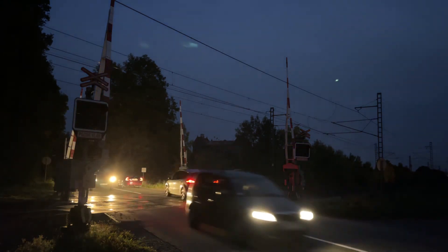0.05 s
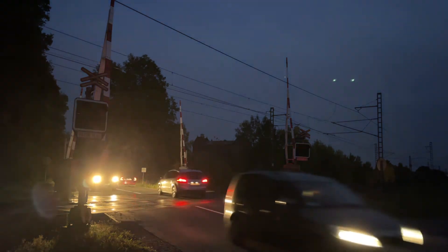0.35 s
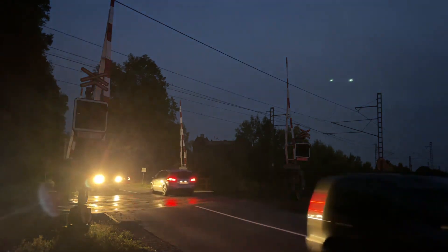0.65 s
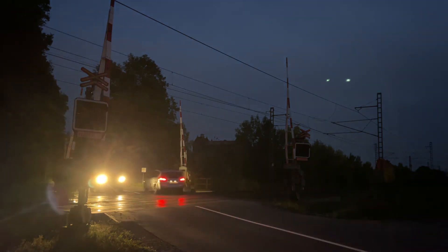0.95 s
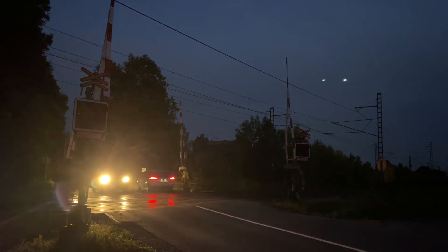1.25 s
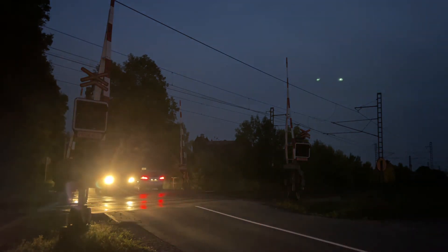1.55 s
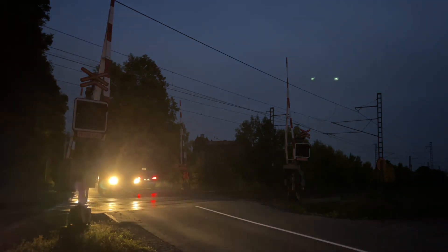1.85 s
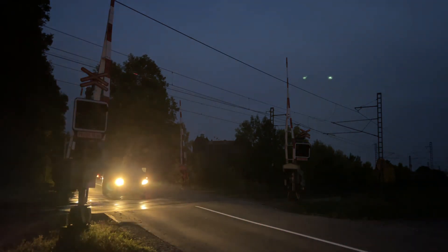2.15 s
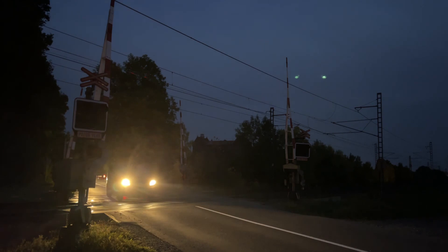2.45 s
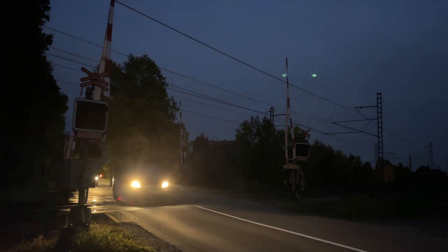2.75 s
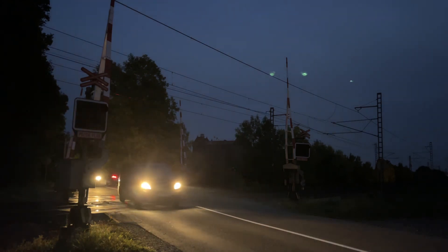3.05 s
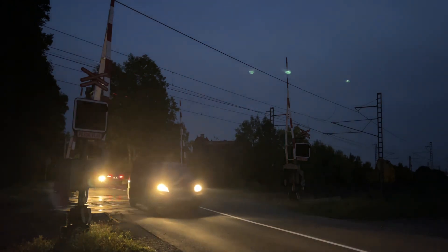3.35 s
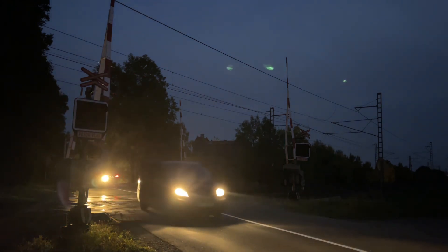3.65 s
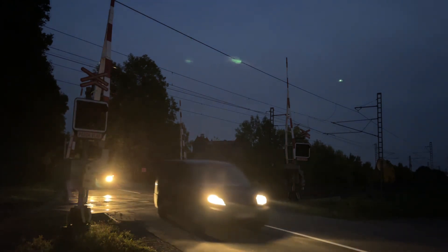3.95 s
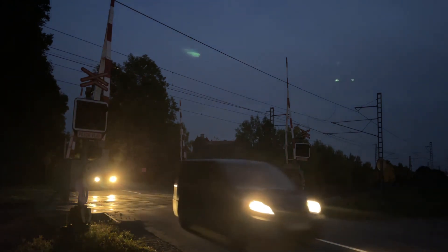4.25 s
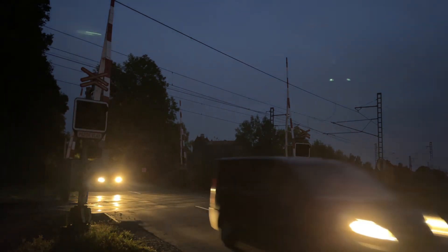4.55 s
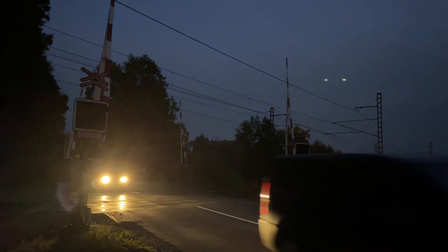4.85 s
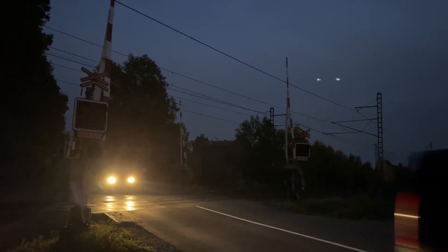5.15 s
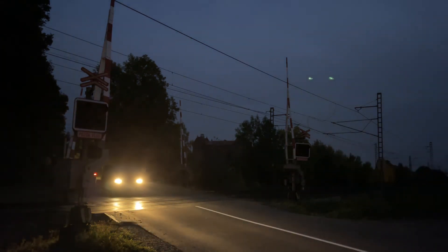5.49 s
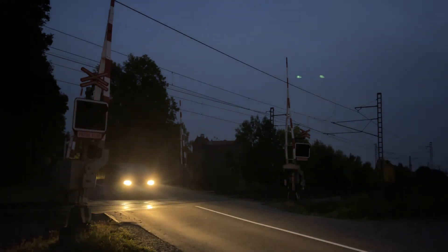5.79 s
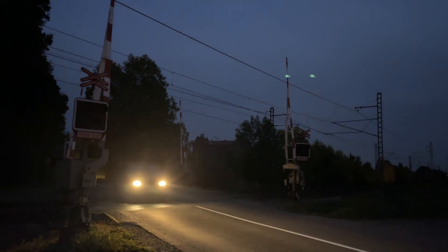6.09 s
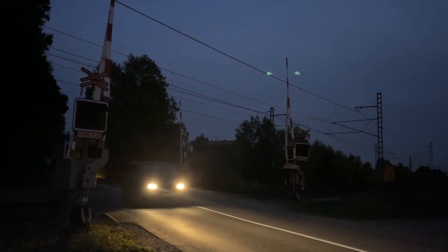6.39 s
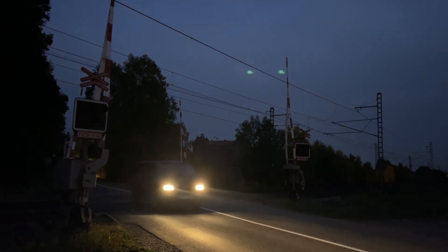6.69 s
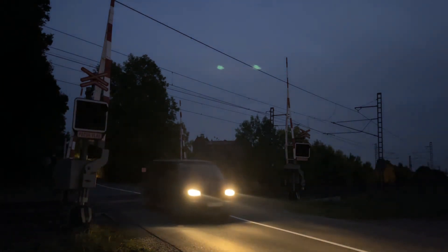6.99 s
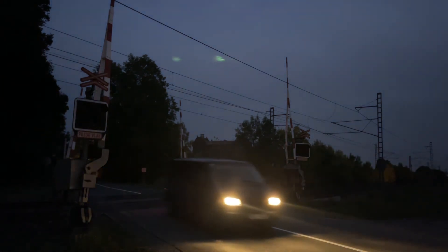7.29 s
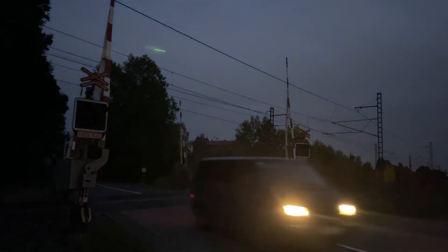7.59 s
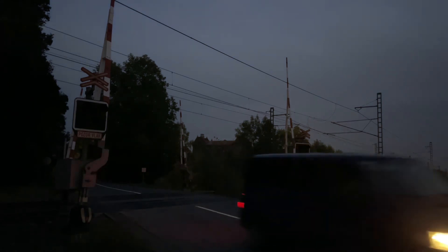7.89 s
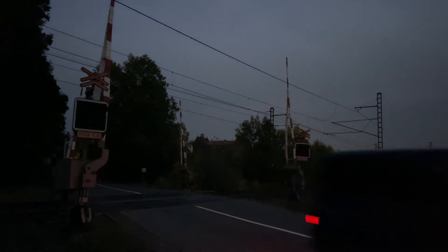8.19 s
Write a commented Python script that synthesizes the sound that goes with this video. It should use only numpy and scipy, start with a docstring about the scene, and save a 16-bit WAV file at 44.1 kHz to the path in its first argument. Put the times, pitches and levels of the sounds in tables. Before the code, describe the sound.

Three vehicles pass one after another on a damp road, engines and tyre roar swelling and fading, wheels thumping over a railway crossing.

```python
"""First a car's tyres roar on damp asphalt and thud over a railway crossing at dusk. Two diesel vans
follow it past on the right. A low hum sinks as the car goes by; the first van changes gear.
The treads hiss, throw spray and flick grit, the slabs drum, exhausts boom and engine bays growl.
The first van whines as it revs and its turbo lets off air; a loose slab clacks under the last.
Two microphones a hand apart stand at the roadside."""
import sys
import numpy as np
from scipy import signal
from scipy.fft import rfft, irfft, next_fast_len
from scipy.io import wavfile
from scipy.ndimage import map_coordinates

SR = 44100
rng = np.random.default_rng(int(sys.argv[2]) if len(sys.argv) > 2 else 0)


def inscribe(sig):
    """Save sig as 16-bit PCM at rate SR to the path in sys.argv[1].

    A 1-D sig is mono; a 2-D sig holds one channel per row.
    Samples are clipped to [-1, 1] before scaling.
    """
    pcm = np.round(np.clip(np.atleast_2d(sig).T, -1, 1) * 32767)
    wavfile.write(sys.argv[1], SR, pcm.astype(np.int16))


N = 367353
TIME = np.arange(N) / SR
FFT_SIZE = next_fast_len(N, real=True)
BIN_HZ = np.maximum(np.arange(FFT_SIZE // 2 + 1) * SR / FFT_SIZE, 1)


def from_db(db):
    """Decibels to gain."""
    return 10 ** (np.asarray(db) / 20)


def rms_one(x):
    """Scale to unit power."""
    return x / np.sqrt(np.mean(x ** 2) + 1e-20)


def automation(points):
    """A curve through (time, value) breakpoints, one value a sample."""
    return np.interp(TIME, *np.transpose(points))


def at_hz(points, hz):
    """Read a curve along a log-frequency axis."""
    point_hz, values = np.transpose(points)
    return np.interp(np.log(hz), np.log(point_hz), values)


def held(start_s, end_s, attack_s, release_s):
    """Envelope that is 1 from start to end, with a straight ramp before and after."""
    return np.clip(1 + np.minimum((TIME - start_s) / attack_s, (end_s - TIME) / release_s), 0, 1)


def drift(rate):
    """Random modulation of rms 1 that takes a new turn rate times a second."""
    knots = rng.standard_normal(3000)
    return rms_one(np.interp(TIME * rate, np.arange(len(knots)), knots))


def band(x, low_hz, high_hz):
    """Causal band-pass."""
    sos = signal.butter(2, [low_hz, high_hz], "band", fs=SR, output="sos")
    return signal.sosfilt(sos, x + 1e-18)


def strikes(events):
    """One click for each row of t/s, level/dB."""
    clicks = np.zeros(N)
    for s, db in events:
        clicks[round(s * SR)] += from_db(db)
    return clicks


def ring(clicks, hz, t60):
    """A unit click sets a sine of height 1 ringing."""
    r, w = from_db(-60 / (t60 * SR)), 2 * np.pi * hz / SR
    return signal.lfilter([0, np.sin(w)], [1, -2 * r * np.cos(w), r * r], clicks + 1e-18)


def colour(eq, low_hz, high_hz, order=12):
    """Gain per frequency: an EQ curve between two steep edges."""
    edges = np.sqrt((1 + (low_hz / BIN_HZ) ** order) * (1 + (BIN_HZ / high_hz) ** order))
    return from_db(at_hz(eq, BIN_HZ)) / edges


def noise(gain):
    """White noise shaped by a gain per frequency."""
    return irfft(gain * rfft(rng.standard_normal(FFT_SIZE)), FFT_SIZE)[:N]


def wide_noise(gain, likeness):
    """Mid-side noise of rms 1; its width follows the left-right likeness, clipped to -1..1."""
    alike = np.clip(at_hz(likeness, BIN_HZ), -1, 1)
    mid, side = noise(gain * np.sqrt(1 + alike)), noise(gain * np.sqrt(1 - alike))
    return rms_one(mid + side * [[1], [-1]])


def swell(peak_s, spread_s, hz, width_hz, db):
    """A band of noise under a bell-shaped fade."""
    bell = np.exp(-((TIME - peak_s) / spread_s) ** 2 / 2)
    rush = rms_one(band(rng.standard_normal(N), hz - width_hz / 2, hz + width_hz / 2))
    return from_db(db) * bell * rush


# Pass-bys of the car, the first van and the last van: closest at t/s, speed/(m/s)
PASSES = [(.85, 7.88), (5.05, 7.78), (8.35, 7)]
LANE_DISTANCE_M, ROAD_ANGLE_DEG, WHEELBASE_M = 4.52, -35, 1.4
MIC_SPACING_M, SOUND_M_S = 0.14, 343


def path(closest_s, speed, ahead_m=0):
    """Distance/m and pan (-1 left, 1 right) of a point on a vehicle; sound bends round the housing."""
    along_m = speed * (closest_s - TIME) - ahead_m
    sine = np.sin(np.arctan2(LANE_DISTANCE_M, along_m) + np.radians(ROAD_ANGLE_DEG))
    return np.hypot(along_m, LANE_DISTANCE_M), (sine + np.arcsin(sine)) / (1 + np.pi / 2)


def axle_pans(vehicle):
    """Pans of the front and the rear wheels."""
    return [path(*vehicle, ahead_m=end * WHEELBASE_M / 2)[1] for end in (1, -1)]


def place(x, pan, shade_db=0.66):
    """A source on the right reaches the left microphone later and weaker."""
    lag = pan * MIC_SPACING_M / SOUND_M_S * SR / 2
    return np.array([map_coordinates(x, [np.arange(N) + side * lag], order=3, mode="nearest")
                     * from_db(side * shade_db * pan) for side in (-1, 1)])


# Faders by layer; each is thrown forward or back, so it peaks early or late: level/dB, lead/s
CAR_LAYERS = {"rumble": (-33, -.05), "drone": (-31, 0.22), "roar": (-28, 0.3), "hiss": (-40, 0.52),
              "fizz": (-46, 0.53), "spray": (-41, 0.46), "boom": (-33.5, 0.21), "second order": (-43, 0.47),
              "third order": (-42.5, 0.22), "growl": (-32.5, 0.16)}
VAN_LAYERS = {"rumble": (-32, -0.064), "drone": (-31, 0.23), "roar": (-31.5, 0.35), "hiss": (-39, 0.084),
              "fizz": (-41.5, 0.15), "spray": (-34.5, 0.19), "boom": (-21, 0.45),
              "second order": (-36.5, -0.044), "third order": (-32.5, 0.017), "growl": (-33, 0.23)}
LAST_VAN_LAYERS = {"rumble": (-32, 0.085), "drone": (-31.5, 0.44), "roar": (-29, 0.18),
                   "hiss": (-40.5, 0.16), "fizz": (-47, 0.11), "spray": (-44, 0.23), "boom": (-22.5, .01),
                   "second order": (-30, -0.065), "third order": (-34, .06), "growl": (-39, 0.32)}
# Each layer's loss per doubling of distance: approaching/dB, leaving/dB
FALL_OFF = {"rumble": (4.53, 5.66), "drone": (7.1, 8.5), "roar": (5.2, 9), "hiss": (4.3, 10.5),
            "fizz": (6.8, 10.6), "spray": (12.4, 27.3), "boom": (11.5, 12.3), "second order": (8.6, 6.4),
            "third order": (5.95, 13.8), "growl": (5, 10.4)}


def passing(vehicle, layers):
    """Fader ride in dB for each layer of a vehicle: up to its peak, then away with distance."""
    closest_s, speed = vehicle
    levels = {}
    for name, (peak_db, lead_s) in layers.items():
        peak_s = closest_s - lead_s
        doublings = np.log2(path(peak_s, speed)[0] / LANE_DISTANCE_M)
        levels[name] = peak_db - doublings * np.where(TIME < peak_s, *FALL_OFF[name])
    return levels


# Sizzle of spray off the damp road: f/Hz, level/dB
SPRAY_EQ = [(6000, 4), (7500, -3), (8600, -2), (9700, 2.5), (11200, 6.5), (12000, -1), (13000, -23)]
# Stereo image of spray and grit: f/Hz, left-right likeness
SPRAY_LIKENESS = [(6400, 0.29), (7100, -0.46), (7800, 1), (8700, 0.064), (9300, 0.55), (9800, -1.45),
                  (10500, -1.07), (11100, -0.21), (11700, 0.87)]


def spray(level_db, sizzle_db=1.2, even_db=-47.5, brightening=0.33):
    """Droplets off the treads sizzle in the top octave; nearer, denser spray is brighter."""
    mist = wide_noise(colour(SPRAY_EQ, 6150, 16000), SPRAY_LIKENESS)
    coarse = irfft(rfft(mist, FFT_SIZE) / (1 + (BIN_HZ / 9200) ** 24), FFT_SIZE)[:, :N]
    fine = mist - coarse
    tilt_db = brightening * (level_db - even_db)
    tilted = from_db(-tilt_db) * coarse + from_db(np.minimum(tilt_db, 0)) * fine
    return from_db(level_db + sizzle_db * drift(150)) * tilted


# Ticks of grit flicked from the tread: t/s, level/dB before the trim
GRIT_TICKS = [(6.326, -40), (6.428, -42), (6.508, -34), (6.527, -46), (6.588, -40), (6.823, -44)]
# Their bright tone: f/Hz, level/dB
GRIT_EQ = [(5500, -3), (8000, 5), (9500, -6), (11500, 6), (13000, -14)]


def grit(t60=0.073, trim_db=-7.5):
    """Small stones rattle in the wheel arches with short bright ticks."""
    decay = signal.lfilter([1], [1, -from_db(-60 / (t60 * SR))], strikes(GRIT_TICKS) + 1e-18)
    return from_db(trim_db) * decay * wide_noise(colour(GRIT_EQ, 5500, 13000), SPRAY_LIKENESS)


# Tyres on the crossing slabs: from t/s, until t/s, drumming level/dB, splash level/dB
SLAB_RUNS = [(2.002, 2.95, -39.5, -82), (6.5, 6.952, -34.5, -57.5)]
SLAB_RAMP_S = 0.43


def slab_drumming(low_hz=50, high_hz=92):
    """The uneven crossing shakes the wheels."""
    shaking = sum(from_db(db) * held(start_s, end_s, SLAB_RAMP_S, SLAB_RAMP_S)
                  for start_s, end_s, db, _ in SLAB_RUNS)
    return shaking * rms_one(band(rng.standard_normal(N), low_hz, high_hz))


def wetness(levels):
    """Fader in dB for all the spray: from the treads and from the joints of the crossing."""
    splashes = [from_db(db) * held(start_s, end_s, SLAB_RAMP_S, SLAB_RAMP_S)
                for start_s, end_s, _, db in SLAB_RUNS]
    treads = [from_db(level["spray"]) for level in levels]
    return 10 * np.log10(sum(gain ** 2 for gain in splashes + treads))


# Ring of the loose slab: f/Hz, relative level/dB, t60/s
SLAB_MODES = [(550, 1, .07), (640, -2, .06), (790, -5, .05)]


def slab_knock(at_s=8.2, strike_db=-28.5):
    """A loose slab rocks and clacks under the last van."""
    click = strikes([(at_s, strike_db)])
    return sum(from_db(db) * ring(click, hz, t60) for hz, db, t60 in SLAB_MODES)


# Wheels dropping over rails and slabs: t/s, strike level/dB
WHEEL_DROPS = [(.525, -25), (.70, -28.5), (3.425, -27), (3.522, -22), (5.935, -29), (6.06, -25.5),
               (6.152, -25), (6.19, -27), (6.274, -27), (6.294, -25), (6.365, -28), (6.57, -23.5),
               (6.848, -25), (6.863, -19.5)]
# Boom of tyre cavity and suspension: f/Hz, relative level/dB, t60/s
WHEEL_MODES = [(58, -10, 0.063), (77, 7.5, 0.079), (98, -17, 0.022), (210, -8, .04)]


def thuds(trim_db=-1.0, soft_hz=105):
    """Soft rubber rolls onto a rail and the wheel booms briefly."""
    push = band(strikes(WHEEL_DROPS), 44.0, soft_hz)
    return sum(from_db(db + trim_db) * ring(push, hz, t60) for hz, db, t60 in WHEEL_MODES)


# Envelope of the turbo's sigh: t/s, level/dB
BLOW_OFF_FADE = [(5.1, -66), (5.32, -41.5), (5.6, -46.5), (5.9, -55), (6.3, -78)]
# Its airy tone: f/Hz, level/dB
BLOW_OFF_EQ = [(4300, -14), (5300, -3.5), (6100, 4.5), (7000, -8), (8200, -1), (9000, -31)]


def blow_off():
    """The first van's turbo lets off air as the driver lifts to change gear."""
    return from_db(automation(BLOW_OFF_FADE)) * rms_one(noise(colour(BLOW_OFF_EQ, 4000, 7300)))


def firing_phase(revs):
    """Phase of an engine's firings; the speed is never quite steady."""
    return 2 * np.pi * np.cumsum(automation(revs) * (1 + 0.0019 * drift(30))) / SR


def rough_tone(phase, roughness=.65):
    """A tone of rms 1 whose strength and phase stagger."""
    stagger = (drift(16) + drift(55) + 1j * (drift(16) + drift(55))) / 2
    return rms_one(np.real((1 + roughness * stagger) * np.exp(1j * phase)))


# Envelope of the pump's tone: t/s, level/dB
PUMP_FADE = [(2.9, -82), (3.35, -48), (4.1, -43), (4.5, -46.5), (4.9, -84)]


def pump(order=5.5):
    """The first van's belt-driven pump sings forward through the grille, tracking the revs."""
    return from_db(automation(PUMP_FADE)) * rough_tone(order * firing_phase(VAN_REVS))


# Beating lines in the exhaust: multiple of the firing rate, level/dB
THROB_ORDERS = [(.75, -36.5), (2.75, -38)]


def throb(span_s=(5.0, 5.52), ramp_s=.12):
    """One uneven cylinder makes the first van's tailpipe throb once it faces the microphones."""
    phase = firing_phase(VAN_REVS)
    lines = sum(from_db(db) * rms_one(np.cos(order * phase)) for order, db in THROB_ORDERS)
    return held(*span_s, ramp_s, ramp_s) * lines


# Cues for the first van's whines: multiple of the firing rate, from t/s, until t/s, level/dB
WHINES = [(10, 2.47, 3.1, -44.5), (14, 2.68, 2.9, -49), (9, 3.39, 3.79, -37), (8, 3.36, 3.47, -42),
          (10, 3.33, 3.72, -45), (8, 3.66, 3.88, -41.5), (7, 3.9, 4.15, -45.5), (8, 4.1, 4.31, -39.5),
          (8, 4.66, 4.87, -30.5), (9, 4.72, 4.89, -34.5), (10, 4.8, 4.97, -32), (10.5, 4.81, 4.93, -32.5),
          (6, 4.9, 5.05, -39.5), (7, 4.93, 5.18, -34.5), (9, 5.12, 5.28, -37.5), (8, 5.07, 5.35, -39.5)]


def whines(attack_s=0.097, release_s=0.086):
    """Engine orders sing in turn as they cross intake and body resonances, rough from uneven firings."""
    phase = firing_phase(VAN_REVS)
    return sum(from_db(db) * held(start_s, end_s, attack_s, release_s) * rough_tone(order * phase)
               for order, start_s, end_s, db in WHINES)


# Whooshes from tread, engine bay and tailpipe: peak t/s, spread/s, f/Hz, width/Hz, level/dB
BEAMS = [(0.4, .18, 990, 150, -36), (0.78, .15, 1090, 180, -35), (1.08, 0.21, 373, 114, -38),
         (0.33, 0.2, 4640, 600, -47.5), (1.11, 0.12, 4200, 740, -57), (3.5, 0.66, 510, 120, -42.5),
         (5.09, 0.22, 740, 400, -32), (4.62, 0.11, 1980, 300, -38), (5.027, 0.34, 1990, 240, -35.5),
         (8.17, 0.24, 710, 202, -32.5), (8.2, .22, 3600, 1500, -47.5), (7.64, .3, 3300, 400, -51),
         (7.3, 0.43, 924, 220, -41), (1.36, 0.12, 1960, 1100, -40.5), (1.78, 0.5, 1900, 1040, -38.5),
         (5.48, 0.15, 304, 65, -33), (0.43, 0.069, 8000, 3300, -46.5), (0.34, 0.18, 470, 280, -32),
         (3.5, 0.26, 1895, 142, -43.5), (0.53, 0.098, 2130, 1200, -35), (7.15, 0.52, 1200, 830, -36.5),
         (6.6, 0.52, 459, 197, -42.5)]


def beams(vehicle):
    """Noise thrown one way swells while it faces the microphones; each cue goes to the nearest pass."""
    out = np.zeros(N)
    for peak_s, *shape in BEAMS:
        nearest = min(PASSES, key=lambda other: abs(peak_s - other[0]))
        if nearest == vehicle:
            out += swell(peak_s, *shape)
    return out


# Late roar of the car, the first van and the last van: level/dB
LATE_ROAR_DB = [-31.5, -36.5, -25]


def late_roar(vehicle, db, after_s=0.47):
    """A midrange tyre roar swells just after each vehicle passes."""
    return swell(vehicle[0] + after_s, spread_s=0.4, hz=1185, width_hz=570, db=db)


# Exhaust surges: t/s, length/s, level/dB
SURGES = [(0.724, 0.22, -24.5), (1.034, .04, -27.5), (1.27, 0.33, -31), (2.481, 0.34, -30),
          (3.55, .02, -25), (3.74, 0.35, -30), (5.58, 0.077, -25.5), (6.678, 0.77, -28.5)]


def surges(start_s, end_s, attack_s=0.068, release_s=0.056, sag_db_per_s=10):
    """Envelope of one exhaust booming up as the load changes: each surge rises fast, sags and dies."""
    return sum(from_db(db - sag_db_per_s * np.maximum(TIME - s, 0))
               * held(s, s + length_s, attack_s, release_s)
               for s, length_s, db in SURGES if start_s < s < end_s)


# Pitch of the low hum that sinks as the car goes by: t/s, f/Hz
CAR_HUM = [(0, 73.2), (.45, 81), (.6, 63.7), (.72, 56.97), (.87, 61.23), (1.06, 58), (1.45, 41.45),
           (1.8, 42.56)]
# Rev curves of the vans: t/s, firing rate f/Hz
VAN_REVS = [(1.75, 45.98), (2.52, 52.21), (2.85, 54.53), (3.6, 60.26), (4.1, 66.68), (4.7, 71.94),
            (5.35, 75.12), (5.5, 72.5), (5.9, 53.46)]
LAST_VAN_REVS = [(5.85, 53.46), (6.2, 54.48), (7, 58), (7.5, 61.1), (7.95, 62.8), (8.33, 63.1)]
# Resonances of intake and engine bay that the growl sweeps through: f/Hz, relative level/dB
CAR_BAY = [(100, -15), (170, -17), (240, -5.5), (340, 2.5), (560, -1.5), (800, -5.5), (1400, -20)]
VAN_BAY = [(100, -12), (190, 0.5), (290, -18), (350, -23), (440, -12), (500, -6.5), (540, -3.5),
           (580, -7.5), (640, -15), (690, -14), (735, -5), (810, -13), (920, -6), (1150, -56), (1600, -24)]
LAST_VAN_BAY = [(100, -16), (250, 3.5), (310, -2), (370, -8), (430, -1), (550, -2.5), (620, -6),
                (780, -6.5), (1000, -3), (1600, -18)]


def engine(pitch, levels, bay, throttle_s, coast_db, growl_db, uneven_db, clatter_db, rough,
           waver_db=1.5, fade_s=0.11, throttle_ramp_s=0.17):
    """Four cylinders: a clean exhaust boom, a growl in the bay resonances and a knock at each firing."""
    pitch_hz, phase = automation(pitch), firing_phase(pitch)
    start_s, end_s = pitch[0][0], pitch[-1][0]
    boom = np.hypot(from_db(levels["boom"]), surges(start_s, end_s)) * np.cos(phase)
    for order, name in ((2, "second order"), (3, "third order")):
        boom += from_db(levels[name] + waver_db * drift(9)) * np.cos(order * phase)
    growl = 0
    for order in [1.5, 2.5, *np.arange(3.5, 18, .5)]:
        # unequal cylinders put weaker lines halfway between the firing orders
        gain = from_db(at_hz(bay, order * pitch_hz) + (uneven_db if order % 1 else 0))
        flutter = 1 + rough * (drift(22) + drift(4.02)) / np.sqrt(2)
        growl += gain * flutter * np.cos(order * phase + rng.uniform(0, 2 * np.pi))
    knocks = ((1 + np.cos(phase)) / 2) ** 4 * (1 + .6 * np.cos(phase / 2))
    clatter = rms_one(knocks * band(rng.standard_normal(N), 1820, 2020))
    coasting = 1 - held(*throttle_s, throttle_ramp_s, throttle_ramp_s)
    load = from_db(levels["growl"] + coast_db * coasting)
    bay_sound = load * (from_db(growl_db) * growl + from_db(clatter_db) * clatter)
    return held(start_s, end_s, fade_s, fade_s) * (np.sqrt(2) * boom + bay_sound)


# Tone of each vehicle's tyre roll, shaping each band from within: f/Hz, relative level/dB
CAR_TYRE_EQ = [(100, 3.5), (170, -2), (250, 3.5), (350, -2), (560, 0), (760, -3.5), (1020, 2.5),
               (1350, -5.5), (2000, -4), (2700, -11.5), (3700, -16.5), (4900, -22.5), (6000, -37)]
VAN_TYRE_EQ = [(100, 2), (170, -0.5), (280, -1), (400, -10), (550, -7), (750, -4.5), (920, -3.5),
               (1150, -8.5), (1650, -6.5), (2000, -8), (2700, -16), (4200, -19.5), (6000, -21)]
LAST_VAN_TYRE_EQ = [(100, 4), (170, 0), (270, 3), (380, -9), (480, 0), (700, -9.5), (940, -1), (1200, -3.5),
                    (1550, -4), (2000, -9), (2700, -15), (4200, -24), (6000, -29)]
# Stereo image of the wash off trees and ground: f/Hz, left-right likeness
SCATTER_LIKENESS = [(80, 0.9), (250, 0.65), (600, -1.37), (1200, -0.89), (3500, 0.79), (4400, -0.21),
                    (5400, 0.038), (6300, 1)]


def tyres(eq, vehicle, levels, scatter_db, hiss_scatter_db, flutter_db=1.36, hiss_flutter_db=1.31):
    """Rolling noise from rumble up to fizz: straight from both axles, and scattered by the roadside."""
    edges_hz = [48, 400, 880, 2400, 4300, 6500]
    direct, scattered = 0, 0
    for low, high, name in zip(edges_hz, edges_hz[1:], ("rumble", "drone", "roar", "hiss", "fizz")):
        tone = colour(eq, low, high)
        treble = name in ("hiss", "fizz")
        scatter = from_db(hiss_scatter_db if treble else scatter_db)
        asphalt_db = (hiss_flutter_db if treble else flutter_db) * drift(25)   # uneven road
        gain = from_db(levels[name] + asphalt_db) / np.hypot(1, scatter)
        direct += gain * rms_one(np.array([noise(tone), noise(tone)]))
        scattered += gain * scatter * wide_noise(tone, SCATTER_LIKENESS)
    axles = sum(place(axle, pan) for axle, pan in zip(direct, axle_pans(vehicle)))
    return axles / np.sqrt(2) + scattered


def scene(bass_bend=1.86):
    """The three vehicles drive by, each with its tyres, engine and spray."""
    car, van, last_van = PASSES
    levels = [passing(car, CAR_LAYERS), passing(van, VAN_LAYERS), passing(last_van, LAST_VAN_LAYERS)]
    car_db, van_db, last_van_db = levels
    rolling = [tyres(CAR_TYRE_EQ, car, car_db, scatter_db=-4.5, hiss_scatter_db=-7.0),
               tyres(VAN_TYRE_EQ, van, van_db, scatter_db=-3.0, hiss_scatter_db=-2.5),
               tyres(LAST_VAN_TYRE_EQ, last_van, last_van_db, scatter_db=-1.5, hiss_scatter_db=-4.0)]
    engines = [engine(CAR_HUM, car_db, CAR_BAY, throttle_s=(0, 0.43), coast_db=-3.5,
                      growl_db=-7.0, uneven_db=-0.5, clatter_db=-26.0, rough=0.82),
               engine(VAN_REVS, van_db, VAN_BAY, throttle_s=(2.48, 6.1), coast_db=-8.0,
                      growl_db=0.5, uneven_db=-4.0, clatter_db=-12.0, rough=0.4) + pump() + throb(),
               engine(LAST_VAN_REVS, last_van_db, LAST_VAN_BAY, throttle_s=(6.9, 8.33), coast_db=-9.0,
                      growl_db=-0.5, uneven_db=-7.5, clatter_db=-27.0, rough=0.5)]
    out = spray(wetness(levels)) + thuds() + slab_drumming() + slab_knock() + grit()
    out += place(blow_off(), path(*van)[1])
    # low notes bend round the microphone housing, so their lag is longer
    out += place(whines(), bass_bend * axle_pans(van)[0], shade_db=2.0)
    for vehicle, wheels, motor, roar_db in zip(PASSES, rolling, engines, LATE_ROAR_DB):
        front, _ = axle_pans(vehicle)
        out += wheels + place(motor, bass_bend * front, shade_db=0.5)
        out += place(beams(vehicle) + late_roar(vehicle, roar_db), path(*vehicle)[1])
    return out


def record(dry, left_dip_db=-1.7, port_hz=6200, port_db=2.0, cutoff_hz=13100):
    """The microphone ports ring a little, the left one is weaker in the midrange, and the top is cut."""
    left = dry[0] + (from_db(left_dip_db) - 1) * band(dry[0], 320, 4300)
    pair = np.array([left, dry[1]])
    pair += (from_db(port_db) - 1) * signal.lfilter(*signal.iirpeak(port_hz, 10, fs=SR), pair)
    return signal.sosfilt(signal.ellip(10, .1, 80, cutoff_hz, fs=SR, output="sos"), pair)


dry = scene()
out = record(dry)
inscribe(out)
```